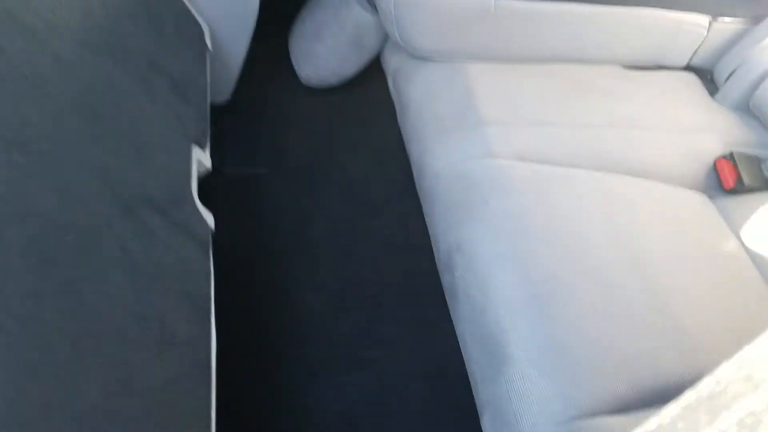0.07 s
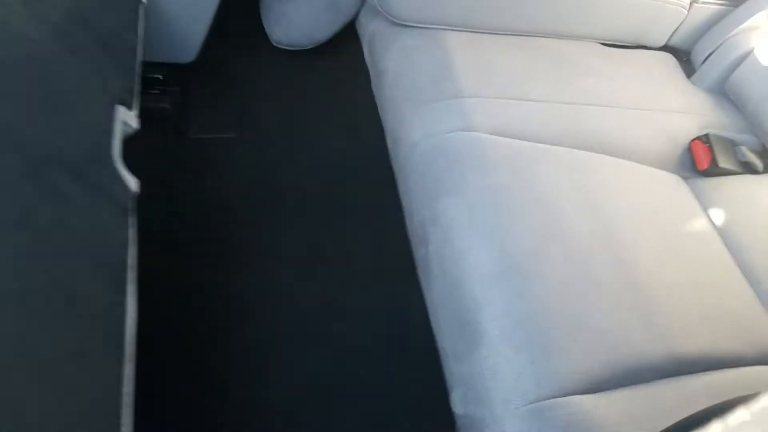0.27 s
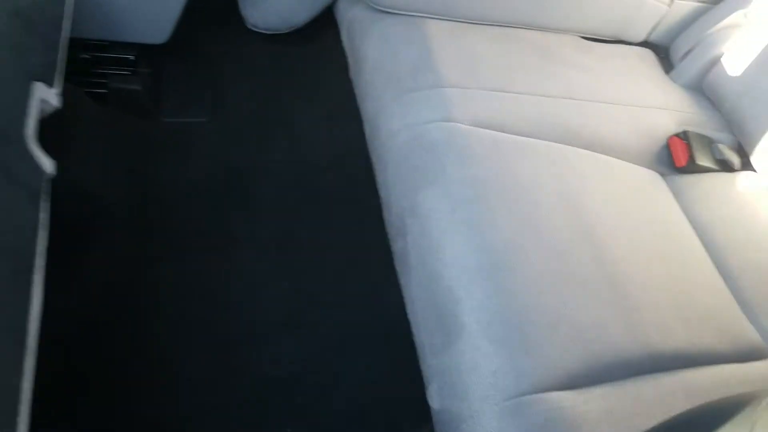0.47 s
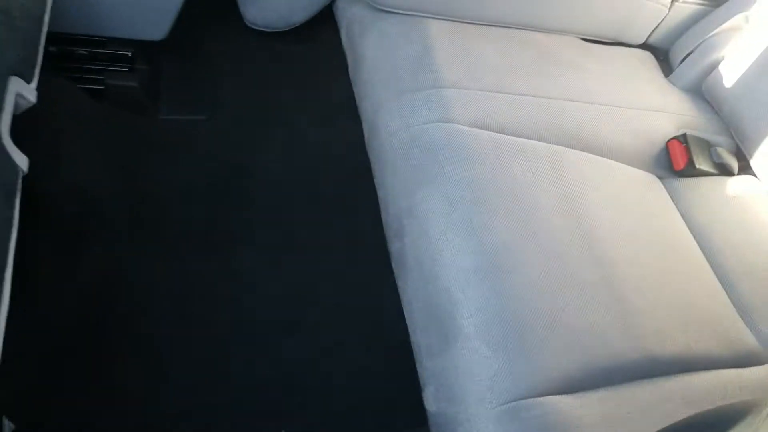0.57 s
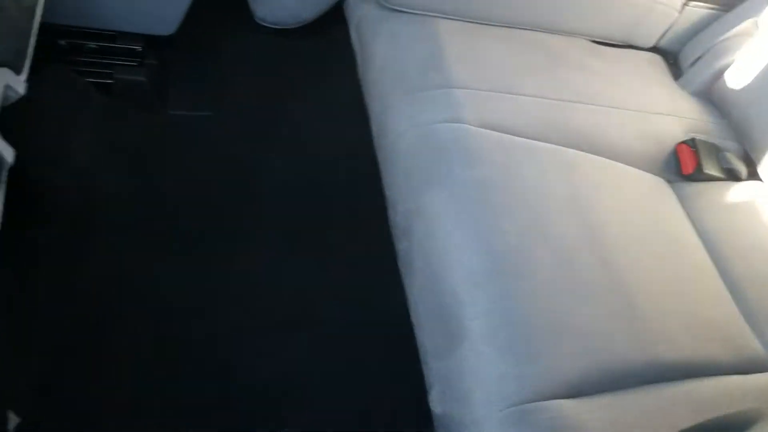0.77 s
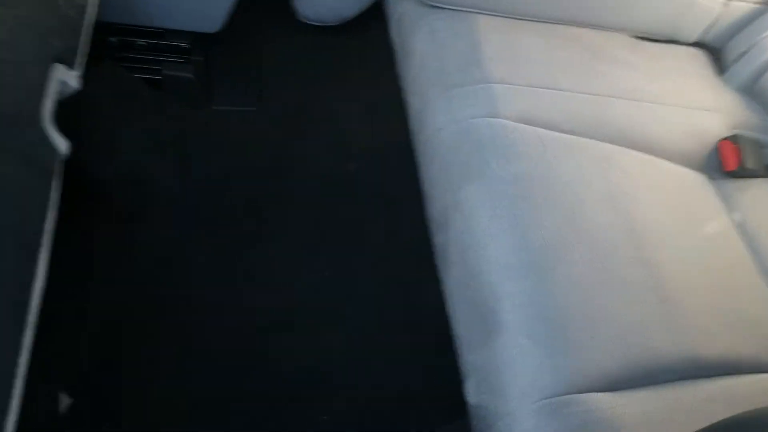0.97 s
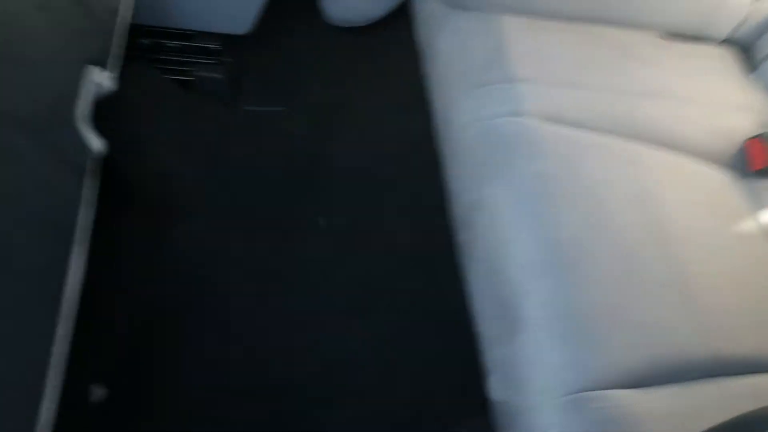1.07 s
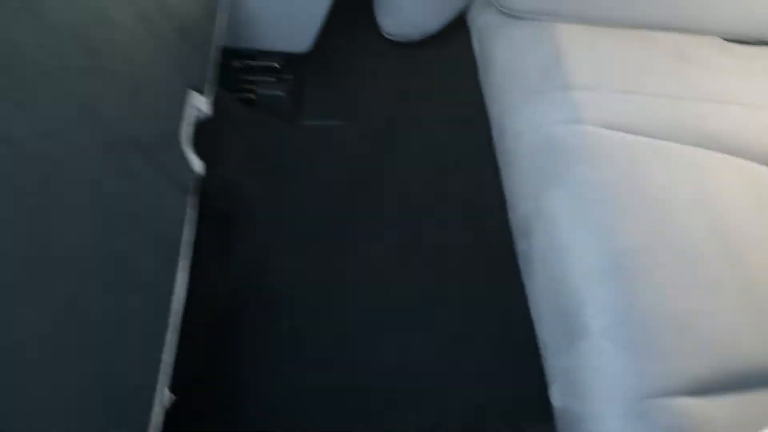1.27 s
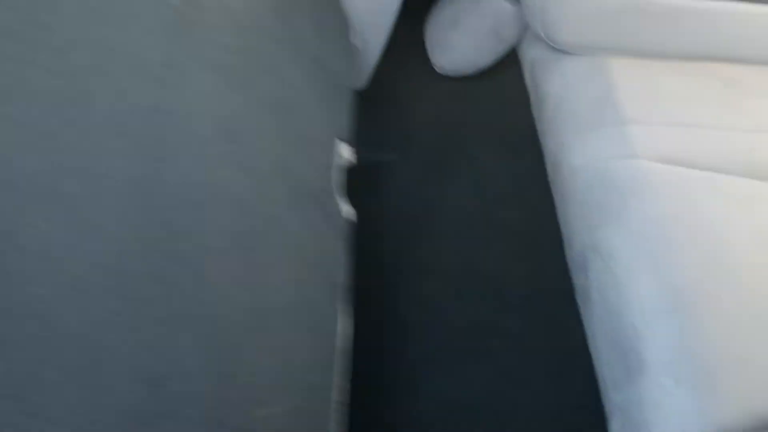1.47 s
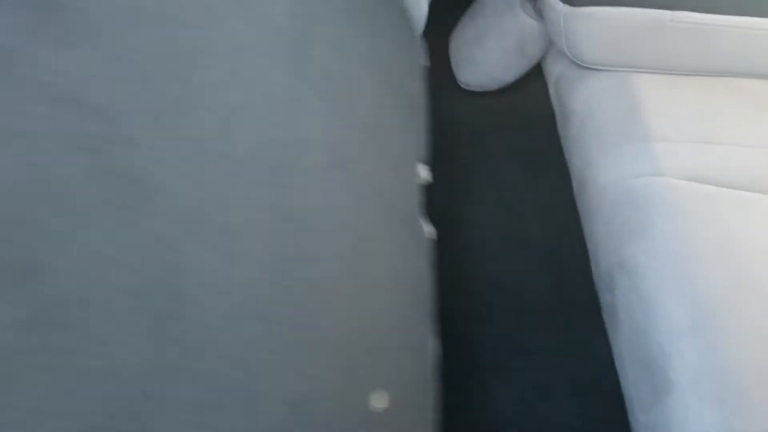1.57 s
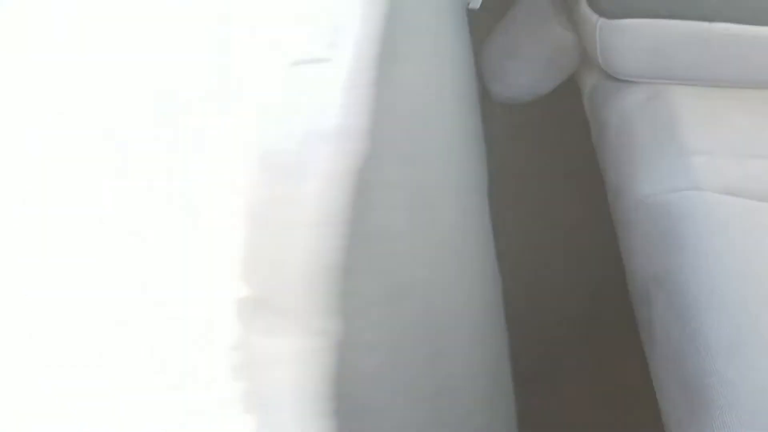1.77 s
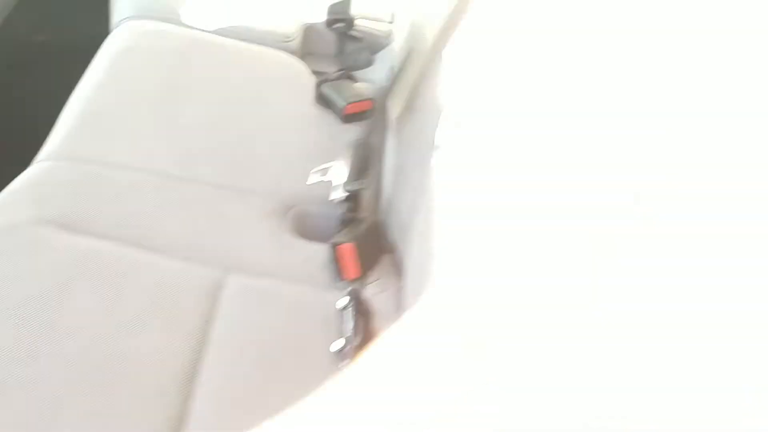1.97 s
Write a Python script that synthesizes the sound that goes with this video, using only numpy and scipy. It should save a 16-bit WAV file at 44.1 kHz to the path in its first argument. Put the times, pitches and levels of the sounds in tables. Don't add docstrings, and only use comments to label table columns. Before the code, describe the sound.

A car seat folds inside a small, padded cabin, heard close over faint rumble and hiss. Soft frame dragging begins at once, with cloth brushes around 0.65-0.9 s and light knocks near 0.9. From 1.2 the juddering scrape grows; at 1.51 the latch snaps, followed at 1.54 by a loud, low padded thump. Small bounces at 1.6-1.75, ticks, and a final cloth sweep follow until 2.0.

```python
import sys
import numpy as np
from scipy import signal
from scipy.fft import rfft, irfft
from scipy.io import wavfile

SR = 44100
rng = np.random.default_rng(int(sys.argv[2]) if len(sys.argv) > 2 else 0)


def invert_db(x):
    u = np.asarray(x, float) / 20
    return 10 ** u


def file_out(sig):
    cols = np.atleast_2d(sig).T
    lim = np.clip(cols, -1, 1)
    pcm = np.round(lim * 32767).astype(np.int16)
    wavfile.write(sys.argv[1], SR, pcm)


N = 88332


def rms_one(x):
    return x / np.sqrt(np.mean(x ** 2) + 1e-20)


def in_time(rows):
    return np.interp(np.arange(N) / SR, *np.transpose(rows))


def at_hz(points, n):
    hz, value = np.transpose(points)
    bins_hz = np.arange(n // 2 + 1) * SR / n
    return np.interp(np.log(bins_hz + 1), np.log(hz), value)


def drift(rate_hz):
    r = np.exp(-2 * np.pi * rate_hz / SR)
    noise = rng.standard_normal(N + SR)
    settled = signal.lfilter([1], [1, -2 * r, r * r], noise)[SR:]
    return rms_one(settled)


def ring(push, hz, t60):
    r, w = invert_db(-60 / (t60 * SR)), 2 * np.pi * hz / SR
    return signal.lfilter([0, np.sin(w)], [1, -2 * r * np.cos(w), r * r], push + 1e-18)


def resonance(x, hz, width_hz):
    r = np.exp(-np.pi * width_hz / SR)
    feedback = [1, -2 * r * np.cos(2 * np.pi * hz / SR), r * r]
    return signal.lfilter([(1 - r * r) / 2, 0, (r * r - 1) / 2], feedback, x)


def ports(mid, side, tilt_db, likeness):
    lag_s = 2.5e-5
    n = len(mid)
    hz = np.arange(n // 2 + 1) * SR / n
    alike = np.clip(at_hz(likeness, n), 0, 1)
    sign = np.array([[1], [-1]])
    pair = np.sqrt(1 + alike) * rfft(mid) + sign * np.sqrt(1 - alike) * rfft(side)
    balance = invert_db(sign * at_hz(tilt_db, n) / 2)
    lag = np.exp(1j * np.pi * sign * lag_s * hz)
    return irfft(pair / np.sqrt(2) * balance * lag, n)


# frequency in Hz, share from 0 to 1.
STEADY_LIKENESS = [(60, 0.56), (240, 0.7), (950, 0.13), (3770, 0.26), (15000, 0.25)]
# frequency in Hz, left over right in dB.
STEADY_TILT = [(60, -3), (380, -2.5), (2380, -4.0), (15000, 0.5)]


def steady(sources, colour):
    mid, side = irfft(rfft(sources) * invert_db(at_hz(colour, N)), N)
    return rms_one(ports(mid, side, STEADY_TILT, STEADY_LIKENESS))


# frequency in Hz, level in dB per Hz.
HISS_COLOUR = [(700, -24), (1500, 2), (3100, -25), (7000, -12.5), (8500, -22.5), (10200, -24),
               (11200, -14.5), (15800, -11.5)]


def hiss():
    return invert_db(-56) * steady(rng.standard_normal((2, N)), HISS_COLOUR)


# frequency in Hz, level in dB per Hz.
RUMBLE_COLOUR = [(12, -54), (20, -21), (43, -12), (51, -14.5), (64, -1.5), (102, -7), (250, -4.5),
                 (320, -11), (550, -120)]


def rumble():
    return invert_db(-53.5 + 0.5 * drift(30)) * steady(rng.standard_normal((2, N)), RUMBLE_COLOUR)


# peak in seconds, level in dB, rise in dB per s, fall in dB per s.
CLOTH_STROKES = [
    (0.649, -45.5, 144, 98),
    (0.788, -46, 248, 67),
    (.89, -49.5, 83, 300),
    (1.36, -45.5, 39, 10),
    (1.602, -42.5, 43, 290),
    (1.69, -48, 148, 2),
    (1.85, -48.5, 35, 30),
    (2, -35, 98, 45),
]
# frequency in Hz, level in dB per Hz.
CLOTH_COLOUR = [(700, -24), (1900, -1), (3250, -13.5), (7000, -13.5), (8600, -19.5), (10200, -22),
                (11300, -14.5), (15800, -11)]


def fabric():
    t = np.arange(N) / SR
    power = np.zeros(N)
    for peak_s, db, rise, fall in CLOTH_STROKES:
        drop_db = np.where(t < peak_s, rise * (peak_s - t), fall * (t - peak_s))
        power += invert_db(2 * (db - drop_db))
    flicker = invert_db(1.0 * drift(45))
    return np.sqrt(power) * flicker * steady(rng.standard_normal((2, N)), CLOTH_COLOUR)


# time in seconds, level in dB.
DRAG_LEVEL = [(0, -46.5), (.12, -44), (.33, -43.5), (.41, -48), (.46, -47), (.6, -51), (.8, -50),
              (.9, -46.5), (.95, -50), (1.08, -50.5), (1.2, -38), (1.36, -32.5), (1.48, -35), (1.56, -31),
              (1.64, -41.5), (1.7, -46), (1.9, -47), (2, -38)]
# frequency in Hz, level in dB per Hz.
FRAME_COLOUR = [(59, -49), (100, -17), (134, -12.5), (323, 3), (371, -4), (581, -1.5), (1080, -6),
                (1260, -9.5), (4000, -26.5), (5200, -41), (8800, -120)]
# frequency in Hz, width in Hz, level in dB.
FRAME_PEAKS = [(540, 80, 2), (894, 100, 4), (1280, 120, 6), (1900, 200, 3)]


def judder():
    lumps = rng.standard_normal(N) * invert_db(3.5 * drift(50))
    return rms_one(ring(np.diff(lumps, prepend=0), hz=377, t60=.05))


def drag():
    slips_per_s, spread_db = 4000, 2.5
    sizes = invert_db(spread_db * np.minimum(rng.exponential(1, (2, N)), 4))
    directions = rng.choice([-1, 1], (2, N))
    slips = sizes * directions * (rng.random((2, N)) < slips_per_s / SR)
    scrape = slips.copy()
    for hz, width_hz, db in FRAME_PEAKS:
        scrape += invert_db(db) * resonance(slips, hz, width_hz)
    level_db = in_time(DRAG_LEVEL)
    judder_db = -4 + 0.26 * (level_db + 36.5)
    return invert_db(level_db) * (steady(scrape, FRAME_COLOUR) + invert_db(judder_db) * judder())


# start in seconds, level in dB, rattle t60 in s, brightness in dB.
CLICK_EVENTS = [(1.5098, -19, 0.045, 7), (1.5135, -17.5, 0.15, -8), (1.518, -37.5, 0.26, -5),
                (1.548, -35, 0.028, 4), (1.559, -18.5, 0.024, -9.5), (.3285, -35, .015, -20),
                (1.6, -42, .05, 2), (1.619, -41, .02, 2), (1.634, -36, .025, 1), (1.661, -40, .02, 0),
                (1.683, -42, .03, 0), (1.79, -28, .035, -14), (1.807, -44, .02, 3), (1.9165, -30, .03, -11),
                (1.9235, -27, .04, -2), (1.957, -28, 0.036, -14), (1.97, -36, 0.022, -12)]
# frequency in Hz, level in dB per Hz.
RATTLE_COLOUR = [(500, -30), (900, -10), (2600, -8), (4500, -17), (6700, 0), (9400, -12), (11500, -2),
                 (16500, -3)]
# frequency in Hz, level in dB, t60 in seconds.
LATCH_MODES = [(2040, -24.5, 0.018), (6140, -35.5, 0.051), (7530, -32, 0.028), (11080, -35, 0.037),
               (12660, -37, 0.01)]


def clicks():
    out = np.zeros((2, N))
    t = np.arange(SR // 8) / SR
    for start_s, db, t60, bright_db in CLICK_EVENTS:
        noise = rng.standard_normal((2, len(t)))
        rattle = rms_one(irfft(rfft(noise) * invert_db(at_hz(RATTLE_COLOUR, len(t))), len(t)))
        force = rattle * invert_db(-60 * t / t60)
        hit = force.copy()
        for hz, mode_db, mode_t60 in LATCH_MODES:
            hit += invert_db(mode_db) * ring(force, hz, mode_t60)
        shelf_db = at_hz([(3200, 0), (5500, bright_db)], len(t))
        hit = irfft(rfft(hit) * invert_db(shelf_db), len(t))
        i = int(start_s * SR)
        out[:, i:i + len(t)] += invert_db(db) * hit[:, :N - i]
    return out


# start in seconds, peak in dB, pitch of the part struck in Hz, spread in octaves.
SEAT_BLOWS = [(0.0238, -32.5, 684, 0.87), (0.886, -32, 486, 0.23), (0.91, -35, 460, 0.23),
              (1.5366, -18, 640, 0.42), (1.5387, -8, 270, 0.33), (1.545, -13.5, 143, 0.29),
              (1.5508, -14.5, 188, 0.36), (1.558, -17, 193, 0.48), (1.559, -22, 62, 0.52),
              (1.56, -18, 418, 0.22), (1.569, -22.5, 400, 0.68), (1.601, -28, 156, 0.45),
              (1.627, -29.5, 232, 0.46), (1.659, -33, 109, 1.1), (1.674, -38, 149, 1),
              (1.713, -29.5, 377, 0.17), (1.7185, -23, 312, 0.25), (1.739, -35, 232, 0.65),
              (1.973, -47, 500, 0.79), (1.989, -26.5, 171, 0.23), (1.995, -32.5, 247, .7)]
# frequency in Hz, level in dB, t60 in seconds.
SEAT_MODES = [(61, 2, .15), (145, 2, .055), (230, 0, .06), (294, -3, .05), (383, -4, .06), (427, -4, .1),
              (533, -4, .08), (645, -3, .05), (708, -4, .08), (850, -5, .05), (960, -5, .05)]


def blows():
    mode_spread_db, crunch_db, crunch_t60 = 1.5, -4.5, 0.05
    out = np.zeros((2, N))
    t = np.arange(SR // 4) / SR
    crunch_band = signal.butter(2, [704, 2500], "band", fs=SR, output="sos")
    for start_s, db, pitch_hz, octaves in SEAT_BLOWS:
        push_band = signal.butter(2, [pitch_hz / 1.8, pitch_hz * 2.5], "band", fs=SR, output="sos")
        push = signal.sosfilt(push_band, signal.unit_impulse(len(t)))
        hit = np.zeros((2, len(t)))
        for hz, mode_db, t60 in SEAT_MODES:
            far = np.log2(hz / pitch_hz) / octaves
            tone = invert_db(mode_db - 2.8 * far ** 2) * ring(push, hz, t60)
            hit[0] += invert_db(mode_spread_db * rng.standard_normal()) * tone
            hit[1] += rng.standard_normal() * tone
        noise = rng.standard_normal((2, len(t)))
        hit += signal.sosfilt(crunch_band, invert_db(crunch_db - 60 * t / crunch_t60) * noise)
        i = int(start_s * SR)
        out[:, i:i + len(t)] += invert_db(db) * hit[:, :N - i]
    return out


def cabin(x):
    t60, wall_cut_hz = 0.21, 1000
    n = 2 * N
    bins = np.arange(N + 1)
    one_sample_late = np.exp(-2j * np.pi * bins / n)
    dull = 1 / (1 + 1j * bins * SR / n / wall_cut_hz)
    out = np.zeros((2, N + 1), complex)
    lags = (rng.uniform(.004, 0.012, 12) * SR).astype(int)
    for k, lag in enumerate(lags):
        loop = invert_db(-60 * lag / SR / t60) * dull * one_sample_late ** lag
        out[k % 2] += (-1) ** (k // 2) * loop / (1 - loop)
    return irfft(out * rfft(x, n), n)[:, :N]


# frequency in Hz, left over right in dB.
HIT_BALANCE = [(40, -5), (150, -1.5), (500, -2.5), (1200, -4.5), (2400, -2), (6000, -3.5)]
# frequency in Hz, share from 0 to 1.
HIT_ALIKE = [(60, .8), (250, .9), (600, .4), (2000, .4), (5000, .7)]


def scene():
    background = hiss() + rumble()
    hits = clicks() + blows()
    direct = ports(*hits, HIT_BALANCE, HIT_ALIKE)
    echoes = invert_db(-24) * cabin(hits[0])
    return background + fabric() + drag() + direct + echoes


def band_limit(x):
    return signal.sosfilt(signal.butter(12, 16860, fs=SR, output="sos"), x)


def record(dry):
    low_pass = signal.ellip(10, .5, 55, 15800, fs=SR, output="sos")
    mix = signal.sosfilt(low_pass, dry)
    return band_limit(mix)


dry = scene()
out = record(dry)
file_out(out)
```